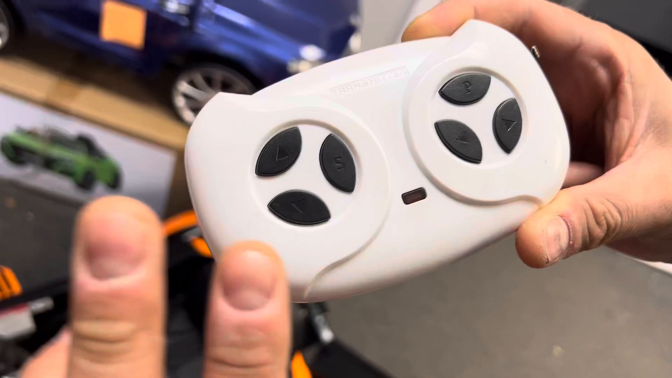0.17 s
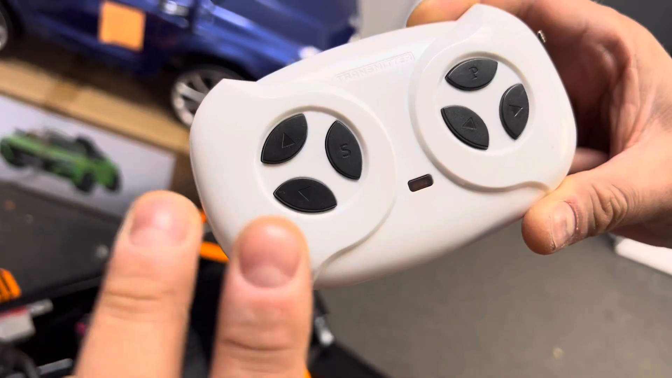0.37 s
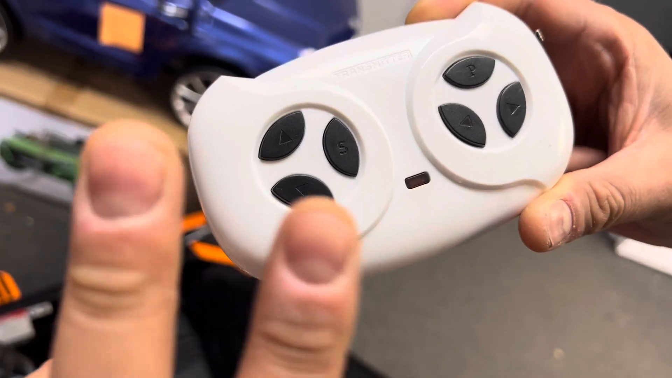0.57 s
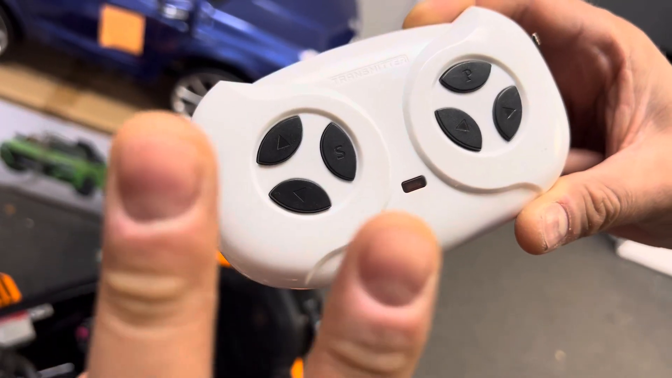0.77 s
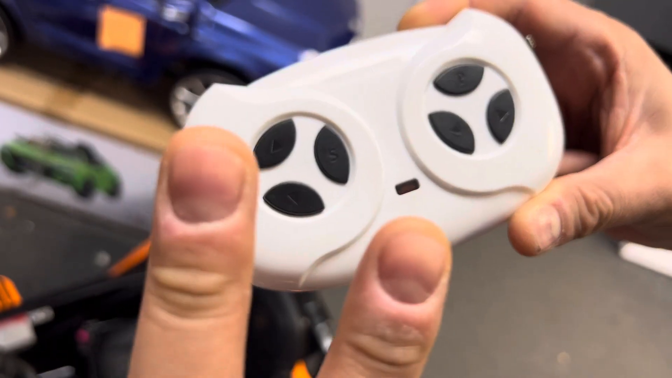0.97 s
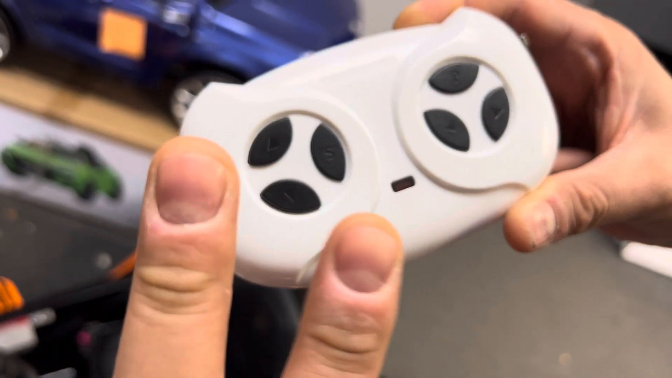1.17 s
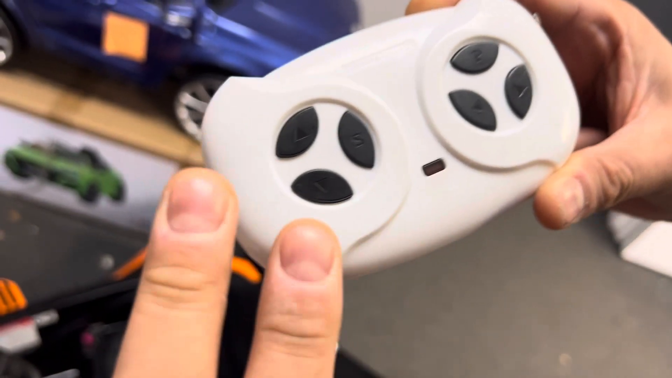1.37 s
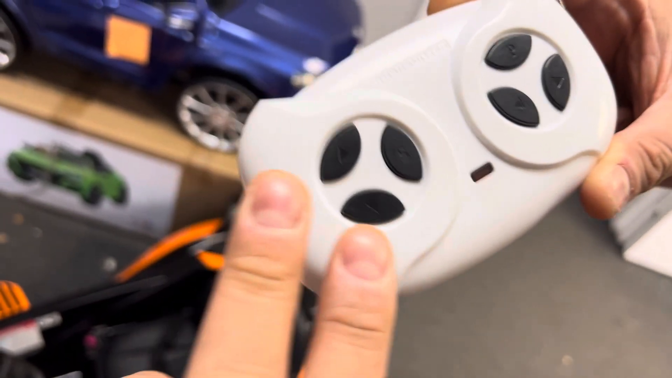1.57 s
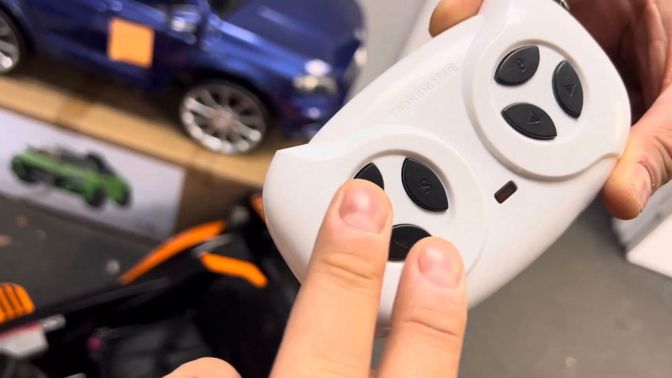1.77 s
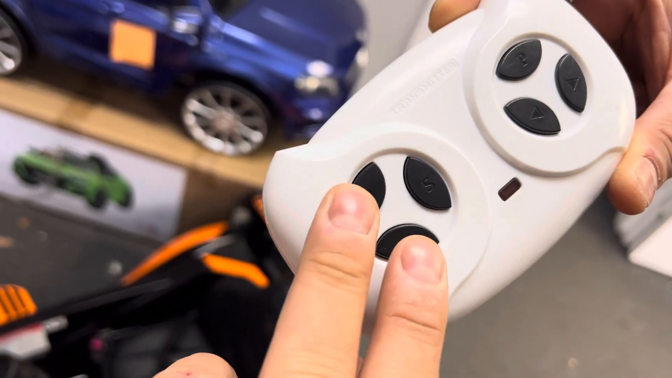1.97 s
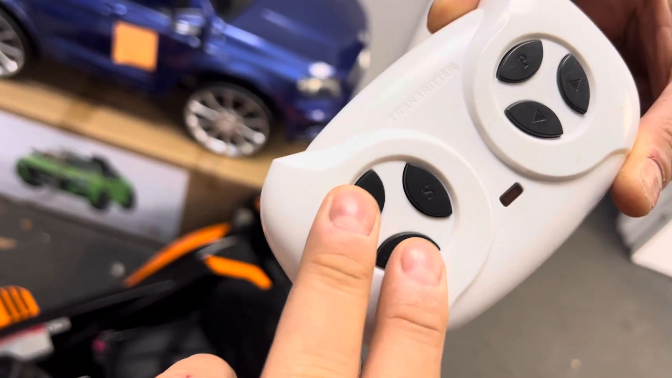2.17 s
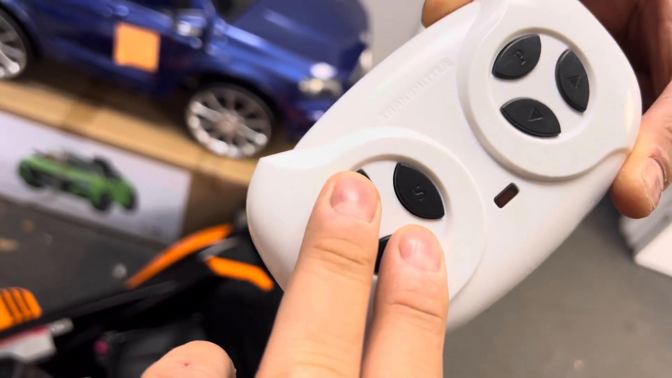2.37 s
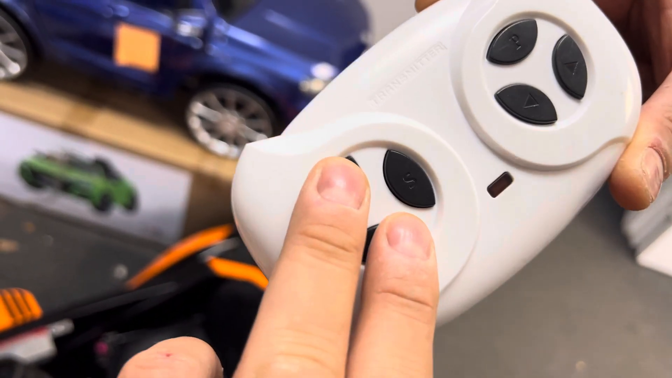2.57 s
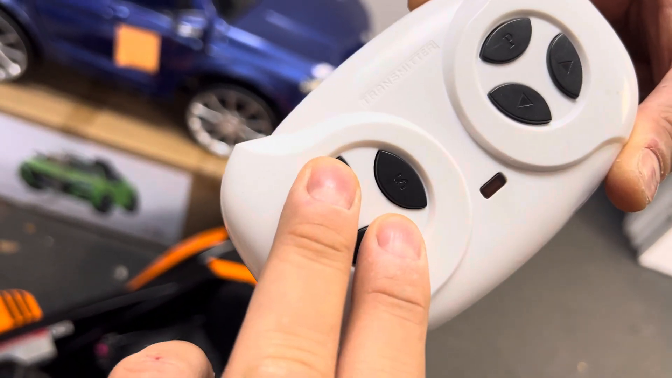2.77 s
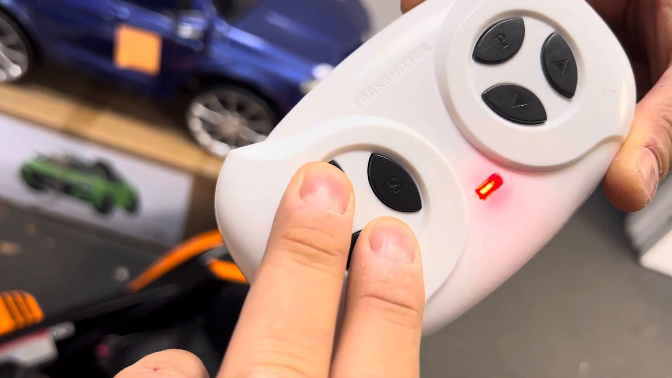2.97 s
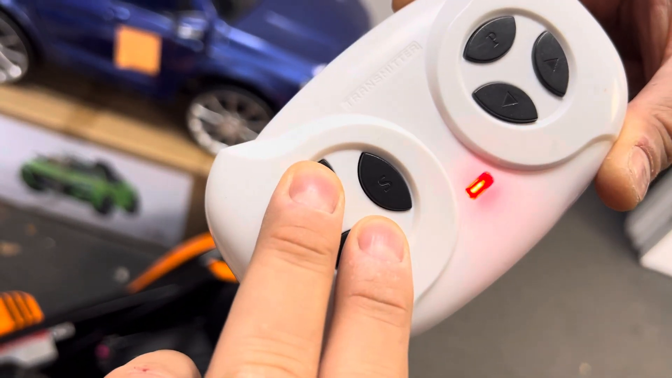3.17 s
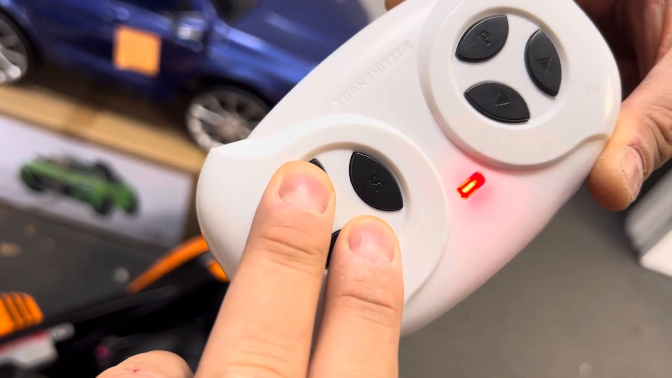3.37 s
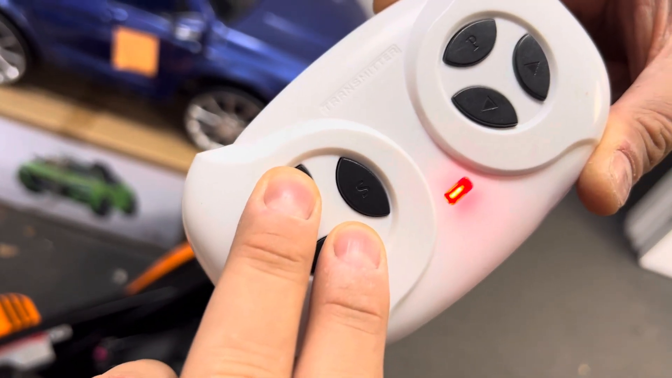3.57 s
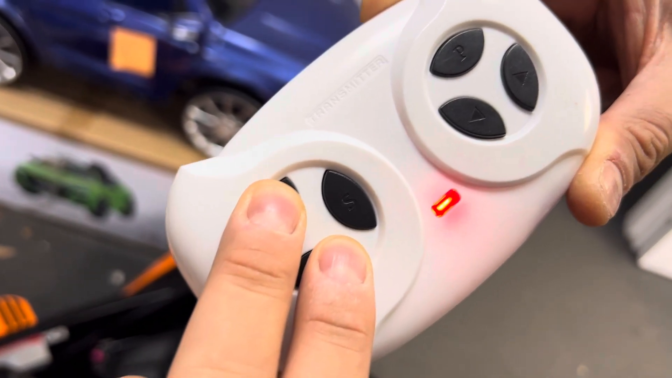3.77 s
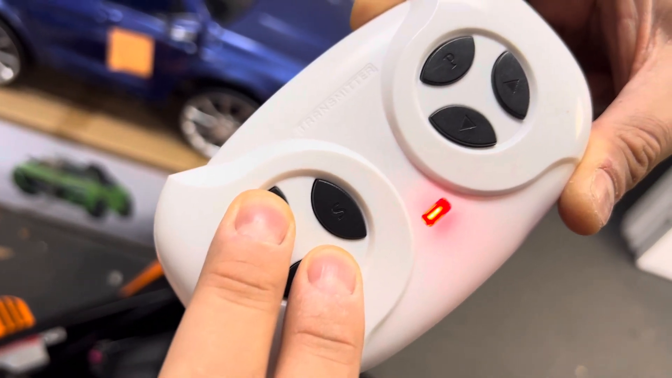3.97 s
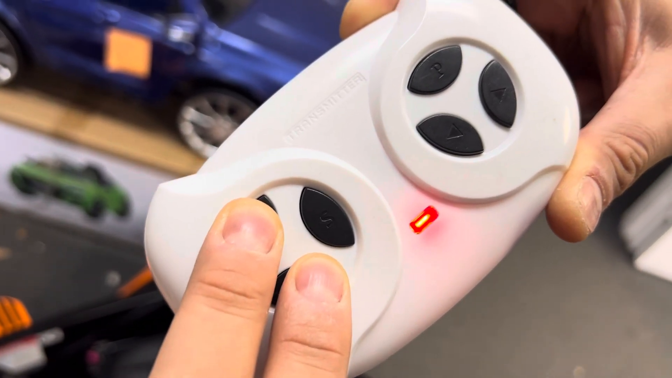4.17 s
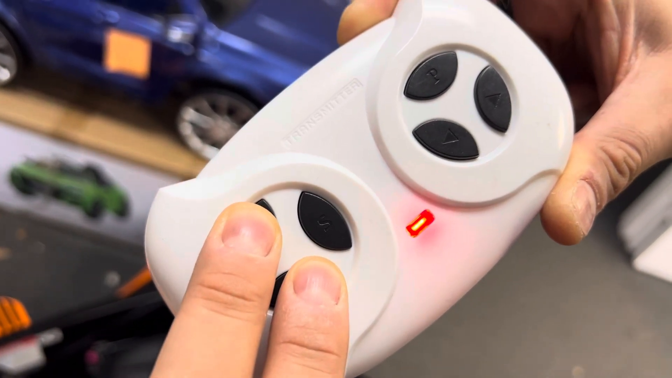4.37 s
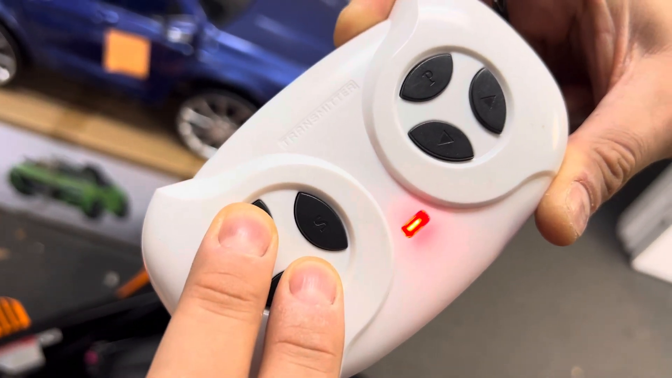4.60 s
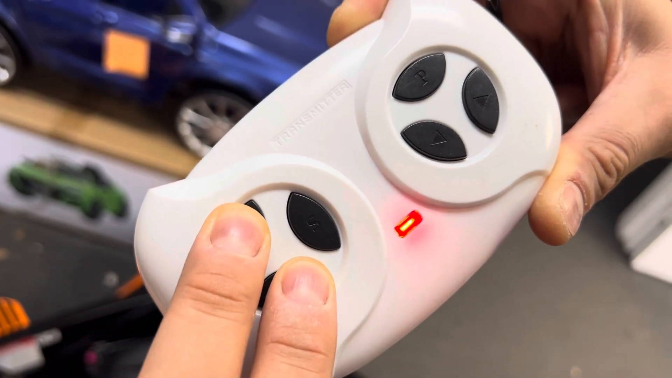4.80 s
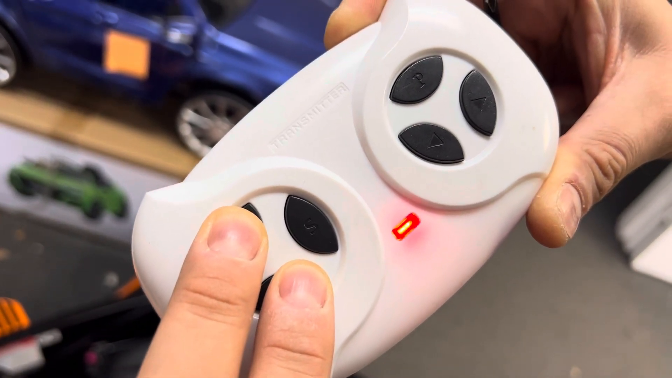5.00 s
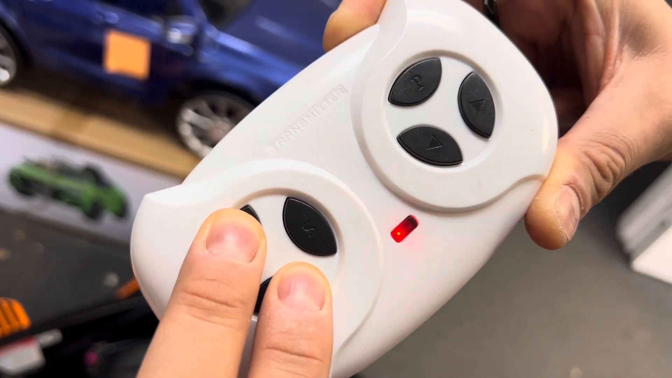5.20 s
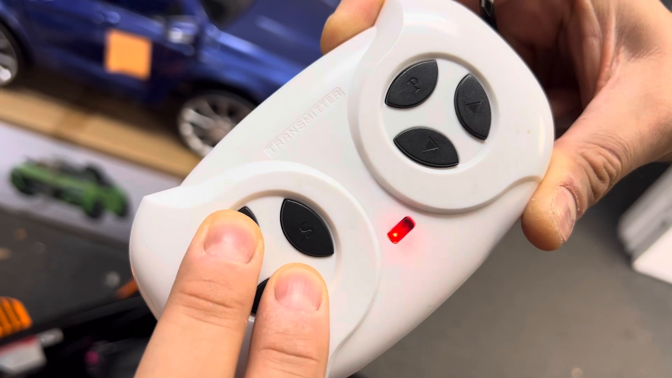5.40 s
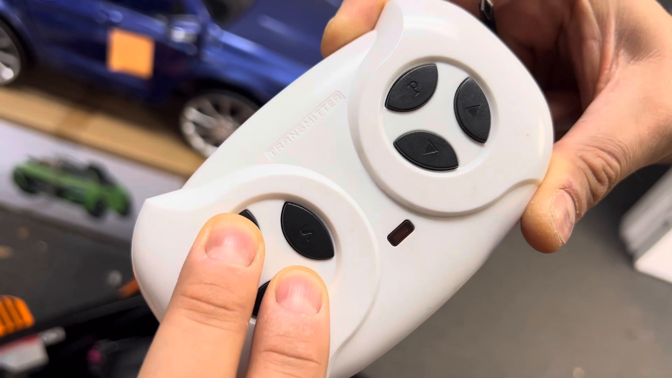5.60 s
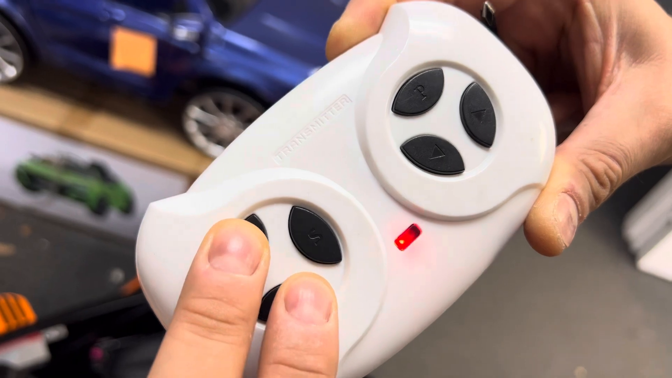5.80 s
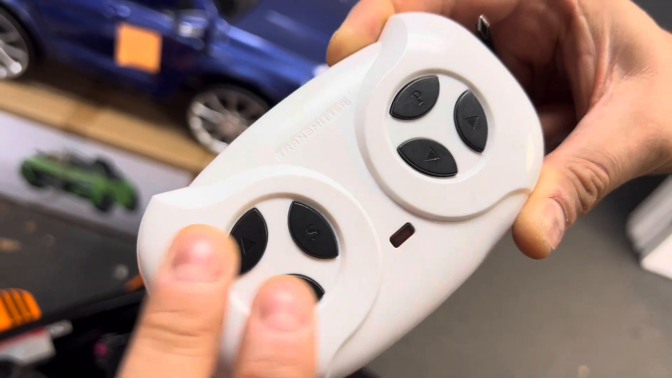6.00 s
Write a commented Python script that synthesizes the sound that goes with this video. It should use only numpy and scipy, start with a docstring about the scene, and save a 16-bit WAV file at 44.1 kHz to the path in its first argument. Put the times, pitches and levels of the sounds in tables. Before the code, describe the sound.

Over a steady indoor ventilation rumble, dull handling knocks precede two crisp plastic button clicks, a long hold, and a sharp springing release with tiny rattles.

```python
"""Ventilation hums throughout; over it come light scuffs, a soft rustle and dull bumps of handling a remote.
Fingers press and release the buttons of its hollow plastic shell, close to the microphone.
Each switch snaps (shaped noise) and rings switch and shell (decaying sines); a freed key rattles.
Ventilation is coloured noise with narrow resonances, bumps are falling sines, scuffs and rustle are noise.
Clicks and scuffs also reach a diffuse room."""
import sys
import numpy as np
from scipy import signal
from scipy.fft import rfft, irfft, next_fast_len
from scipy.io import wavfile

SR = 44100
rng = np.random.default_rng(int(sys.argv[2]) if len(sys.argv) > 2 else 0)


def wrap_up_sound(samples):
    """Save the sound to the file named by the first command line argument, as 16-bit audio."""
    columns = np.atleast_2d(samples).T
    # keep every value between -1 and 1, then stretch to whole-number steps
    tamed = np.clip(columns, -1, 1)
    steps = np.round(tamed * 32767).astype(np.int16)
    wavfile.write(sys.argv[1], SR, steps)


N = 266584
TIME_S = np.arange(N) / SR

# Spectra hold relative levels: each noise is scaled to unit rms before its own level is applied.
# stereo width of noise: [f/Hz, side minus mid/dB]
WIDTH = [(60, -45), (87, -35.5), (130, -31), (180, -24), (260, -19.5), (380, -12), (550, -8), (790, -3.5),
         (1140, -7), (1650, -14.5), (2380, -1.5), (3440, -9), (4970, 7.5), (7180, -0.5), (10400, -3),
         (15000, 0)]

# ventilation rumble spectrum: [f/Hz, density/dB]
RUMBLE_SPECTRUM = [(12, -69.5), (20, -36), (27, -29), (29, -15.5), (36, -14.5), (60, 3.5), (102, -0.5),
                   (124, -3.5), (157, -6), (183, -17), (203, -11), (247, -9.5), (450, -22.5), (580, -60),
                   (990, -120)]
# slow swell of the rumble: [t/s, level/dB]
RUMBLE_LEVEL = [(0, -49), (1.2, -47.5), (1.5, -44.5), (2.4, -46), (2.95, -44), (3.35, -45), (4.2, -44.5),
                (4.8, -45), (5.4, -45), (6, -45.5)]
# rushing air spectrum: [f/Hz, density/dB]
AIR_SPECTRUM = [(240, -20), (400, -2), (520, -6.5), (708, -6), (921, -10), (1220, -6), (1440, -3),
                (1650, -12), (2220, -21), (2970, -27), (3530, -23), (5190, -43), (6800, -44), (11800, -61),
                (13900, -52.5), (16000, -63)]
# rushing air: (full level/dB, how much lower it starts/dB, time to full level/s)
AIR_LEVEL = (-55.5, 3.3, 1.92)
# hum and duct resonances: [f/Hz, half-width at half gain/Hz, median level/dB rms]
HUM = [(59.34, 1.7, -52), (158.7, 6.5, -54.5), (214.8, 17, -59), (1420, 40, -64)]

# fingers graze the plastic: [t/s, level/dB, centre f/Hz]
GRAZES = [(0.0642, -44, 640), (0.07, -50, 1450), (0.8556, -44.5, 1000), (1.8075, -51, 800),
          (1.869, -49, 950), (5.855, -51.5, 2400)]
# hand movements that rustle, each a smooth swell: [middle t/s, length/s, level/dB]
MOVES = [(0.304, 1, -74), (0.967, 0.12, -72), (1.27, 0.28, -77), (1.805, 0.5, -70), (2.116, 0.084, -75)]
# rustle spectrum: [f/Hz, density/dB]
RUSTLE_SPECTRUM = [(1500, -12.5), (2500, 5.5), (3800, 8.5), (4800, 3), (5600, -11.5), (8000, -25.5),
                   (12000, -55)]
# dull handling bumps: [t/s, level/dB, starting f/Hz, length/s]
BUMPS = [(0.7418, -25, 558, 0.013), (0.754, -33.5, 476, 0.0068), (0.76, -27, 217, 0.026),
         (0.855, -36, 706, 0.0055), (0.88, -42, 597, 0.012), (0.9146, -22, 470, 0.0087),
         (0.948, -31, 575, 0.0074), (0.952, -26, 267, 0.013), (0.96, -34, 575, 0.0071),
         (0.98, -35, 393, 0.0077), (0.985, -42.5, 580, 0.011), (0.993, -39.5, 560, 0.008),
         (1.004, -37, 370, 0.017), (1.02, -37.5, 173, 0.035), (1.714, -44.5, 643, 0.009),
         (1.807, -42.5, 800, 0.007), (3.5293, -21, 554, 0.031), (5.281, -24.5, 251, 0.013)]
# a firm bump's period grows by this share per cycle; below FIRM_DB growth shrinks as a power of strength
FIRM_GROWTH, FIRM_DB, GROWTH_POWER = 0.58, -26, 0.86
# skin drag spectrum: [f/Hz, density/dB]
DRAG_SPECTRUM = [(65, -30), (110, -2), (237, -4), (343, -2.5), (470, -4), (600, -24), (700, -34),
                 (910, -52), (2000, -59), (7000, -58), (9700, -63), (11000, -90)]
# hold counts from the start and includes the attack
DRAG_START_S, DRAG_ATTACK_S, DRAG_HOLD_S, DRAG_T60_S, DRAG_DB = 0.95, 0.018, 0.074, 0.12, -45.5

UPPER_KEY, LOWER_KEY, SPRING_BACK = 0, 1, 2  # strike columns of the mode tables
# buttons snap down: [t/s, key, shell thock/dB, its tilt/dB per octave, snap/dB, its tilt/dB per octave]
PRESSES = [(2.697, UPPER_KEY, -31, 0, -41, 1.5), (2.8816, LOWER_KEY, -29, 2, -37, -0.5),
           (2.894, LOWER_KEY, -44, 0, -58, 2)]
PRESS_RING_DB, PRESS_TICK_DB = 10.5, 0  # relative to the snap
# buttons spring back:
# [t/s, shell thock/dB, its tilt/dB per octave, snap/dB, its tilt/dB per octave, top tick/dB]
RELEASES = [(5.7065, -23, -0.5, -33.5, 0, -24), (5.7832, -38, -1, -65, -9, -44),
            (5.8335, -43, -2, -50, 2.5, -44)]
RELEASE_RING_DB = -4.5  # relative to the snap
# freed key rattles in its seat: [t/s, shell thock/dB, snap/dB]
RATTLE = [(5.8515, -43, -48), (5.855, -47, -55), (5.858, -43, -57), (5.8625, -57, -50), (5.874, -60, -57)]
RATTLE_TILT_DB_PER_OCT, RATTLE_SNAP_TILT_DB_PER_OCT = 5.5, -9
RATTLE_RING_DB, RATTLE_TICK_DB = -13, -7  # relative to the snap

# hollow shell modes: [f/Hz, t60/s, left minus right/dB,
#                      level/dB struck by upper key, by lower key, by a key springing back]
SHELL_MODES = [(153, 0.052, -3, -25, -25, -19), (363, 0.038, 3, -17, -20, -17),
               (519, 0.053, 2, -19.5, -9.5, -13), (606, 0.044, -1, -6, -16, -8.5),
               (675, 0.058, 4.5, -6, -14, -8.5), (840, 0.042, 0.5, -4, -13, -9.5),
               (1030, 0.031, 0, -1, -3.5, 1), (1230, 0.013, -8, -21, -11, -23),
               (1495, 0.055, 5, -20, -11.5, -23), (1690, 0.036, 2, -15, -22, -24),
               (2580, 0.027, 4.5, -30, -23, -20)]
# modes of the switch and its key: same columns
SWITCH_MODES = [(2990, 0.015, 8, -5.5, -8, -3), (3650, 0.023, 0, -9, -6.5, -3.5),
                (4420, 0.034, 6, -20, -14, 0), (4560, 0.024, -2, -3, -4.5, -1),
                (4810, 0.014, 7.5, -3, -2.5, -11), (5350, 0.03, -7, -25, -16, -15),
                (5720, 0.022, 2, -12, -13, 4), (6370, 0.011, 3, -8, -13.5, -16),
                (6920, 0.013, 1, -21, -14, 2), (7440, 0.011, 0, -22, -17, -11),
                (8450, 0.011, -1, -30, -29, -16)]
# where a finger lands tilts the colour of each part around these pitches
SHELL_PIVOT_HZ, SWITCH_PIVOT_HZ = 1010, 4600
# dense, damped part of the shell's knock: [f/Hz, density/dB]
KNOCK_SPECTRUM = [(120, 0), (250, 9), (400, 1.5), (560, 3), (800, 4.5), (1100, 10.5), (1500, -8),
                  (2200, -7), (4000, -50)]
# switch crack: [f/Hz, density/dB]
CRACK_SPECTRUM = [(400, -25), (900, 1.5), (2000, 0), (2600, 5.5), (3300, -4), (3680, 2.5), (4080, -3),
                  (4550, 4), (5250, -17), (5780, -2), (6150, -9), (7050, -15.5), (7700, -19), (8500, -29.5),
                  (9500, -37), (16000, -48)]
# its top tick: [f/Hz, density/dB]
TICK_SPECTRUM = [(7500, -41), (9500, -14), (10800, -8), (12800, -15), (14400, 5), (15500, 4), (16500, -14)]
# crack averaged over all directions, as it reaches the room: [f/Hz, density/dB]
RADIATED_SPECTRUM = [(400, -20), (900, 0), (2000, -4), (2700, -2), (3700, 0.5), (4500, 1), (5200, -3),
                     (5900, -2), (7400, -10), (8300, -17), (9500, -36), (16000, -55)]

# phase between left and right: [f/Hz, left lead/rad]
STEREO_PHASE = [(200, -2), (600, 0.5), (800, 0.7), (1030, 0.92), (1250, 0.5), (2300, 1), (3000, 0.8),
                (3700, 0.5), (4200, 1.5), (4650, 3), (5000, 4.5), (5600, 3), (6200, 5), (8000, 5.4),
                (15000, 5)]
ROOM_T60_S, ROOM_DB = 0.32, -15.5
RING_SEND_DB = -14
CUTOFF_HZ = 16200


def from_db(db):
    """Decibels to gain."""
    return 10 ** (np.asarray(db) / 20)


def rms_one(x):
    """Scale to an rms of 1."""
    return x / np.sqrt(np.mean(x ** 2) + 1e-20)


def at_hz(points, hz):
    """Interpolate a spectrum on a log-frequency axis."""
    known_hz, values = np.transpose(points)
    return np.interp(np.log(hz + 1), np.log(known_hz + 1), values)


def tilted(spectrum, tilt_db_per_oct, pivot_hz):
    """Tilt the level column of (Hz, dB, ...) rows about a pivot."""
    return [(hz, db + tilt_db_per_oct * np.log2(hz / pivot_hz), *rest) for hz, db, *rest in spectrum]


def noise(gain_at, side_db, count=N):
    """Stereo noise of rms 1, coloured by gain_at(Hz); side_db offsets the width table."""
    size = next_fast_len(count)
    hz = np.fft.rfftfreq(size, 1 / SR)
    mid, side = rfft(rng.standard_normal((2, size))) * gain_at(hz)
    side = side * from_db(at_hz(WIDTH, hz) + side_db)
    return rms_one(irfft([mid + side, mid - side], size)[:, :count])


def coloured(spectrum, side_db, count=N):
    """Stereo noise of rms 1 with a tabulated spectrum."""
    return noise(lambda hz: from_db(at_hz(spectrum, hz)), side_db, count)


def since(start_s, size=8192):
    """Slice of samples after a moment, and their age in seconds."""
    start = int(start_s * SR)
    span = slice(start, min(start + size, N))
    return span, TIME_S[span] - TIME_S[start]


def burst(start_s, level_db, spectrum, t60_s, onset_s, side_db):
    """Toneless vibration: noise with a fast onset and exponential decay."""
    span, age_s = since(start_s)
    envelope = (1 - np.exp(-age_s / onset_s)) * from_db(-60 * age_s / t60_s)
    wave = envelope * coloured(spectrum, side_db, len(age_s))
    out = np.zeros((2, N))
    # energy depends on level and envelope, not on the draw
    out[:, span] = from_db(level_db) * np.sqrt(np.mean(envelope ** 2)) * rms_one(wave)
    return out


def settling(full_db, lower_db, rise_s):
    """Level in dB that rises linearly, then holds."""
    return full_db - lower_db * np.clip(1 - TIME_S / rise_s, 0, 1)


def ventilation():
    """Rumble and rushing air as broadband noise; hum and duct resonances as narrowband noise that wavers."""
    rumble_db = np.interp(TIME_S, *np.transpose(RUMBLE_LEVEL))
    air_db = settling(*AIR_LEVEL)
    out = from_db(rumble_db) * coloured(RUMBLE_SPECTRUM, side_db=-3.5)
    out += from_db(air_db) * coloured(AIR_SPECTRUM, side_db=-1.0)
    rumble_top_hz = RUMBLE_SPECTRUM[-1][0]
    for centre_hz, half_width_hz, level_db in HUM:
        flow_db = rumble_db if centre_hz < rumble_top_hz else air_db
        resonance = noise(lambda hz: 1 / (1 + ((hz - centre_hz) / half_width_hz) ** 2), side_db=2.0)
        out += from_db(level_db + flow_db - np.median(flow_db)) * resonance
    return out


def grazes(t60_s=0.021, onset_s=0.00081, skirt_db=-17):
    """Light scuffs on the plastic: brief noise bands with skirts falling to either side."""
    out = np.zeros((2, N))
    for start_s, level_db, hz in GRAZES:
        band = [(hz / 4, 3 * skirt_db), (hz / 2, skirt_db), (hz, 0),
                (hz * 2, skirt_db), (hz * 8, 5 * skirt_db)]
        out += burst(start_s, level_db, band, t60_s, onset_s, side_db=-7.0)
    return out


def rustle(slips_per_s=70, slip_s=0.0015, slip_db=5.5):
    """Hand movement rustles: noise swells with each move and with each tiny random slip."""
    slips = (rng.random(N) < slips_per_s / SR) * rng.uniform(0.43, 1, N)
    slip_age = TIME_S[:SR // 20] / slip_s
    slip_pulse = slip_age * np.exp(1 - slip_age)  # peaks at 1
    grain = 1 + from_db(slip_db) * signal.fftconvolve(slips, slip_pulse)[:N]
    moving = sum(from_db(level_db) * np.exp(-2 * ((TIME_S - middle_s) / length_s) ** 2)
                 for middle_s, length_s, level_db in MOVES)
    return moving * coloured(RUSTLE_SPECTRUM, side_db=-2.0) * rms_one(grain)


def bumps(swell_cycles=1.04, softness=1.07):
    """Bending waves arrive highs first, so bumps fall in pitch, firmer ones faster; soft skin damps highs."""
    out = np.zeros(N)
    for start_s, level_db, start_hz, length_s in BUMPS:
        span, age_s = since(start_s)
        growth = FIRM_GROWTH * from_db(GROWTH_POWER * min(level_db - FIRM_DB, 0))
        cycles = np.log1p(growth * start_hz * age_s) / growth
        swell = 1 - np.exp(-(cycles / swell_cycles) ** 2)
        decay = np.exp(-(age_s / length_s) ** 3)
        wave = swell * decay * np.sin(2 * np.pi * cycles)
        skin = signal.butter(6, softness * start_hz, fs=SR, output="sos")
        out[span] += from_db(level_db) * signal.sosfilt(skin, wave)
    return out


def skin_drag():
    """Skin drags once across the plastic: dull noise takes hold, slides, dies away."""
    age_s = TIME_S - DRAG_START_S
    attack = np.clip(age_s / DRAG_ATTACK_S, 0, 1)
    level_db = DRAG_DB - 60 * np.maximum(age_s - DRAG_HOLD_S, 0) / DRAG_T60_S
    return attack * from_db(level_db) * coloured(DRAG_SPECTRUM, side_db=-5.0)


def clicks():
    """All contacts: (s, key, thock dB, thock tilt, snap dB, snap tilt, ring dB, tick dB)."""
    presses = [(s, key, thock, tilt, snap, snap_tilt, snap + PRESS_RING_DB, snap + PRESS_TICK_DB)
               for s, key, thock, tilt, snap, snap_tilt in PRESSES]
    releases = [(s, SPRING_BACK, thock, tilt, snap, snap_tilt, snap + RELEASE_RING_DB, tick)
                for s, thock, tilt, snap, snap_tilt, tick in RELEASES]
    rattle = [(s, SPRING_BACK, thock, RATTLE_TILT_DB_PER_OCT, snap, RATTLE_SNAP_TILT_DB_PER_OCT,
               snap + RATTLE_RING_DB, snap + RATTLE_TICK_DB)
              for s, thock, snap in RATTLE]
    return presses + releases + rattle


def struck(modes, key):
    """Modes as one strike excites them: (Hz, dB, t60 s, left minus right dB)."""
    return [(hz, levels[key], t60_s, pan_db) for hz, t60_s, pan_db, *levels in modes]


def ring(modes, start_s, strike_db, rise_s, scatter_db):
    """A strike swells all modes as decaying sines, alternating in sign, scattered in level."""
    out = np.zeros((2, N))
    hz, mode_db, t60_s, pan_db = np.transpose(modes)[:, :, None]
    signs = (-1) ** np.arange(len(hz))[:, None]
    span, age_s = since(start_s)
    strength_db = mode_db + strike_db - scatter_db * rng.standard_normal(hz.shape)
    level_db = strength_db - 60 * age_s / t60_s
    swell = 1 - np.exp(-(age_s / rise_s) ** 2)
    waves = signs * from_db(level_db) * np.sin(2 * np.pi * hz * age_s) * swell
    out[:, span] = [np.sum(waves * from_db(side * pan_db / 2), axis=0) for side in (1, -1)]
    return out


def body_rings():
    """Each contact rings the modes of the small switch and, a little slower to rise, of the whole shell."""
    out = np.zeros((2, N))
    for s, key, thock_db, thock_tilt, snap_db, snap_tilt, ring_db, tick_db in clicks():
        shell = tilted(struck(SHELL_MODES, key), thock_tilt, SHELL_PIVOT_HZ)
        switch = tilted(struck(SWITCH_MODES, key), snap_tilt, SWITCH_PIVOT_HZ)
        out += ring(shell, s, thock_db, rise_s=0.00084, scatter_db=0.0)
        out += ring(switch, s, ring_db, rise_s=0.0008, scatter_db=2.0)
    return out


def shell_knock(knock_db=-17, t60_s=0.039, onset_s=0.0011):
    """The gripping hand damps the rest of the shell's vibration into a short, toneless knock."""
    out = np.zeros((2, N))
    for s, key, thock_db, tilt, *_ in clicks():
        spectrum = tilted(KNOCK_SPECTRUM, tilt, SHELL_PIVOT_HZ)
        out += burst(s, thock_db + knock_db, spectrum, t60_s, onset_s, side_db=-12.0)
    return out


def switch_crack(crack_db=-4, crack_t60_s=0.048, top_db=-22, top_t60_s=0.018, onset_s=0.00026):
    """Dense, quickly damped vibration of the metal dome and the key above it."""
    out = np.zeros((2, N))
    for s, key, thock_db, thock_tilt, snap_db, snap_tilt, ring_db, tick_db in clicks():
        spectrum = tilted(CRACK_SPECTRUM, snap_tilt, SWITCH_PIVOT_HZ)
        out += burst(s, snap_db + crack_db, spectrum, crack_t60_s, onset_s, side_db=-12.0)
        out += burst(s, tick_db + top_db, TICK_SPECTRUM, top_t60_s, onset_s, side_db=-9.0)
    return out


def radiated(level_db=-1, t60_s=0.034, onset_s=0.0004):
    """What each snap sends into the room: a smooth crack in which the single resonances even out."""
    out = np.zeros((2, N))
    for s, key, thock_db, thock_tilt, snap_db, snap_tilt, *_ in clicks():
        spectrum = tilted(RADIATED_SPECTRUM, snap_tilt, SWITCH_PIVOT_HZ)
        out += burst(s, snap_db + level_db, spectrum, t60_s, onset_s, side_db=-20.0)
    return out


def stereo_phase(x):
    """Shift left against right by a phase that depends on pitch."""
    size = next_fast_len(N)
    phase = at_hz(STEREO_PHASE, np.fft.rfftfreq(size, 1 / SR))
    shift = np.exp(1j * np.outer([1, -1], phase) / 2)
    return irfft(rfft(x, size) * shift, size)[:, :N]


def room(x, early_db=-13, early_t60_s=0.15, gap_s=0.0058, low_hz=900, high_hz=9000):
    """Quick reflections from hands and nearby goods plus a thin diffuse tail: decaying noise, convolved."""
    age_s = TIME_S[:SR // 2]
    early, late = rng.standard_normal((2, 2, len(age_s))) * (age_s > gap_s)
    early = rms_one(early * from_db(-60 * age_s / early_t60_s))
    late = rms_one(late * from_db(-60 * age_s / ROOM_T60_S))
    response = (from_db(early_db) * early + from_db(ROOM_DB) * late) / np.sqrt(len(age_s))
    band = signal.butter(1, [low_hz, high_hz], "band", fs=SR, output="sos")
    return signal.fftconvolve(x, signal.sosfilt(band, response), axes=1)[:, :N]


def scene():
    """The remote before the microphone; the crack carries into the room better than hand-damped rings."""
    rings = body_rings() + shell_knock() + grazes()
    reflections = room(from_db(RING_SEND_DB) * rings + radiated())
    direct = stereo_phase(rings + switch_crack())
    background = ventilation()
    handling = bumps() + skin_drag() + rustle()
    return background + handling + direct + reflections


def record(dry, low_cut_hz=35):
    """Sound fades in quickly after a brief silence; the deepest bass and the top are cut."""
    fade_in = np.clip((TIME_S - 0.035) / 0.004, 0, 1)
    low_cut = signal.butter(2, low_cut_hz, "high", fs=SR, output="sos")
    top_cut = signal.ellip(10, 0.1, 80, CUTOFF_HZ, fs=SR, output="sos")
    return signal.sosfilt(top_cut, signal.sosfilt(low_cut, dry * fade_in))


dry = scene()
out = record(dry)
wrap_up_sound(out)
```